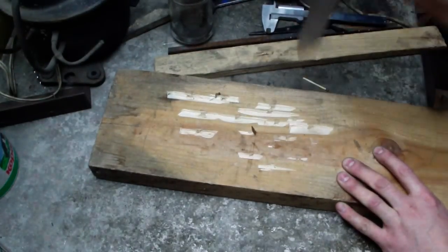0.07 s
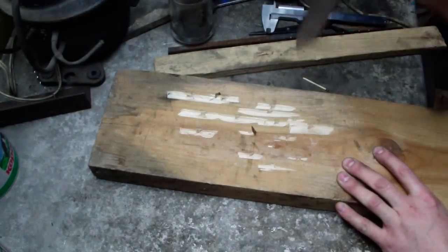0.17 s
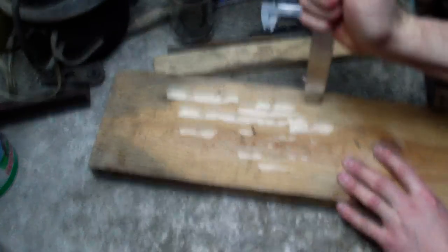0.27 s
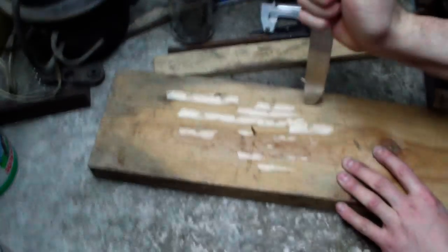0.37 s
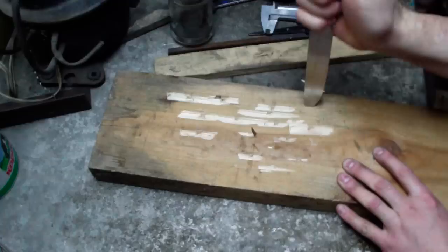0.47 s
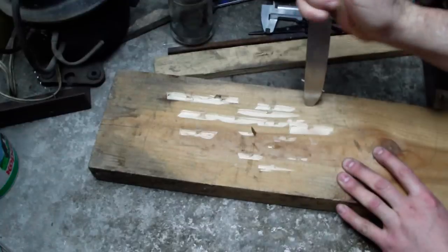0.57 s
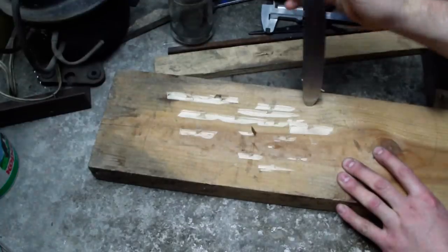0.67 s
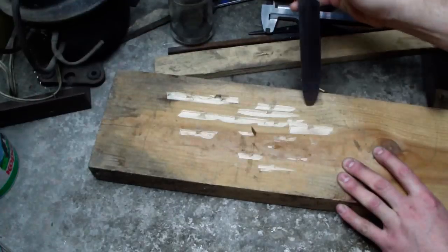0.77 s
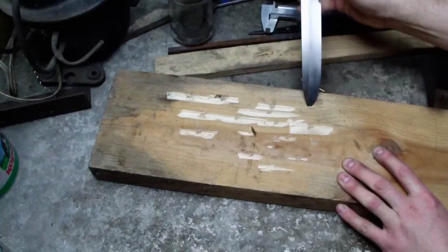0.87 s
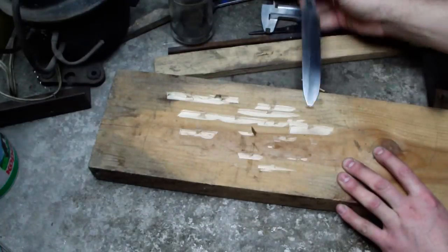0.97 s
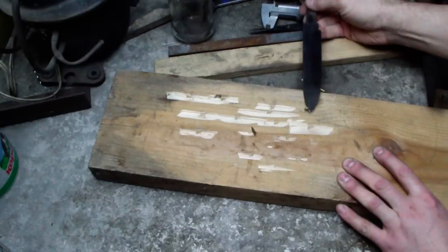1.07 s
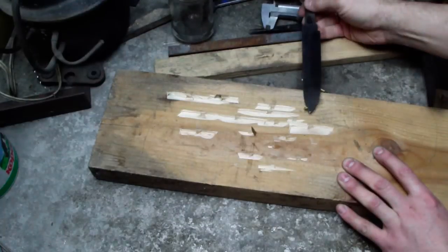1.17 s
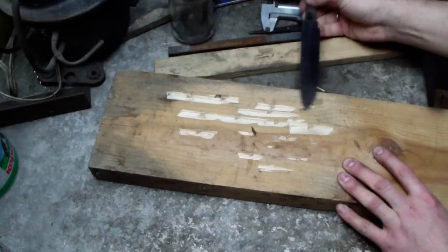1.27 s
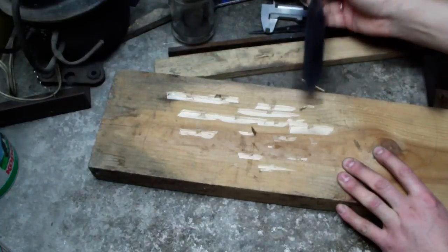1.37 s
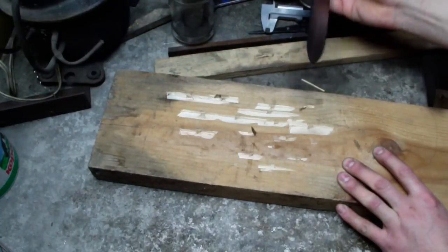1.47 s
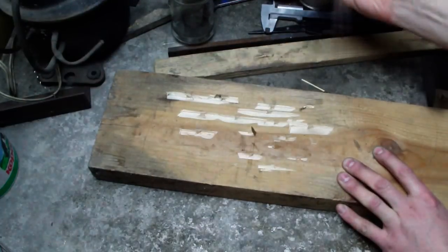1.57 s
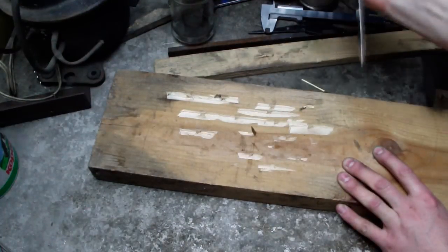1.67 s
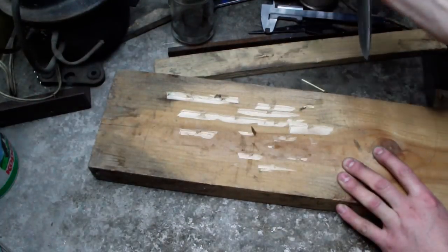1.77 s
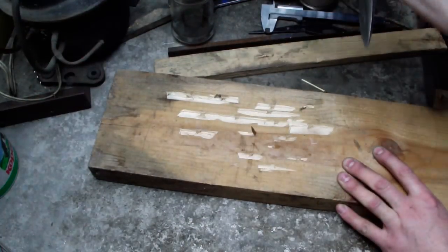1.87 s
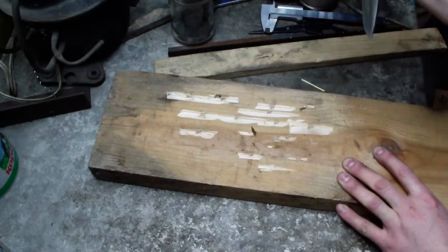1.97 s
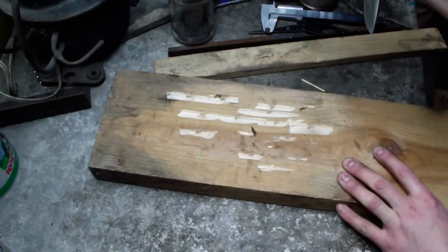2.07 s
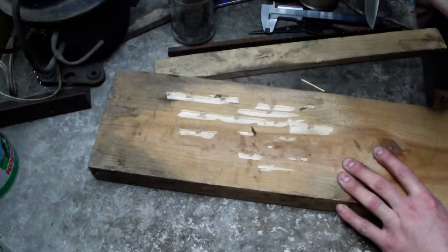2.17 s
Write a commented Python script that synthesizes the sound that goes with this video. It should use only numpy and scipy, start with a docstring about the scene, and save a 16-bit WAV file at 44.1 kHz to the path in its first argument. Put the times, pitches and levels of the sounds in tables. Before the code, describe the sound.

A knife is driven into a wooden plank with a loud sharp knock, rapid chatter and low bench boom; small steel clicks follow, then uneven plank knocks as it pulls free, close and overloaded in a small workshop.

```python
"""Knife stabbed into a plank

A knife is stabbed into a plank on a workbench: the bench booms and the plank and loose tools chatter.
The blade clicks as it is levered, then the plank lifts and knocks back down while the point pulls free.
Knocks and clicks are bursts of coloured reflections plus ringing; squeals are brief trembling sine tones.
A small workshop adds shaped hiss and a thin whine, all heard by a close, overloaded microphone."""
import sys
import numpy as np
from scipy import signal
from scipy.fft import rfft, irfft
from scipy.io import wavfile
from scipy.ndimage import uniform_filter1d

SR = 44100
rng = np.random.default_rng(int(sys.argv[2]) if len(sys.argv) > 2 else 0)


def to_wav(sig):
    """Store sig (one row per channel, or 1-D mono) as 16-bit WAV at the path in sys.argv[1].

    Samples outside -1..1 are clipped; the rate is SR.
    """
    pcm = np.clip(np.atleast_2d(sig), -1, 1) * 32767
    pcm = np.round(pcm).astype(np.int16)
    wavfile.write(sys.argv[1], SR, pcm.T)  # frames by channels


N = 97020
T = np.arange(round(0.6 * SR)) / SR  # clock of one short sound, in seconds


def amp(db):
    """Turns decibels into a gain."""
    return 10 ** (np.asarray(db) / 20)


def evened(x):
    """Scales a signal to an rms (average strength) of one."""
    return x / np.sqrt(np.mean(x ** 2) + 1e-20)


def read(points, hz):
    """Reads a curve between its points, along a logarithmic pitch axis."""
    point_hz, value = np.transpose(points)
    return np.interp(np.log(hz + 1), np.log(point_hz + 1), value)


def fade(t, t60):
    """Dies away by 60 dB in t60 seconds; stays full before time zero."""
    return np.exp(-np.log(1000) * np.maximum(t, 0) / t60)


def hump(length):
    """Swells and sinks once within the length in seconds, as half a sine wave."""
    return np.sin(np.pi * np.minimum(T / length, 1))


def add(mix, s, sound):
    """Lays a sound into the mix, starting at s seconds."""
    part = mix[:, round(s * SR):][:, :sound.shape[-1]]
    part += sound[..., :part.shape[1]]


def shaped_noise(gain):
    """Noise as long as the scene, with a gain for each frequency."""
    return irfft(rfft(rng.standard_normal(N)) * gain, N)


def coloured(x, points, tilt=((1, 0), (2, 0))):
    """Filters by a colour of unit power, then a tilt in dB, with no sound ahead of its cause."""
    size = 2048
    hz = abs(np.fft.fftfreq(size, 1 / SR))
    gain = evened(amp(read(points, hz))) * amp(read(tilt, hz))
    # the Hilbert transform gives the phase that puts the energy as early as possible
    spectrum = np.exp(np.conj(signal.hilbert(np.log(gain + 1e-6))))
    taps = np.fft.ifft(spectrum).real
    return signal.fftconvolve(x, taps[None, :size // 2], axes=1)[:, :x.shape[1]]


def reflections():
    """Dense echoes of random sign that differ between the ears mostly in the treble."""
    # Left-right difference of the echoes. Each row: frequency in Hz, level in dB.
    width = [(100, -59), (500, -48), (1500, -40), (3000, -31.5), (8000, -27), (15000, -19)]
    signs = rng.choice([-1., 1.], (2, len(T)))
    kept = rng.random((2, len(T))) < 1 / 5  # about one moment in five has an echo
    mid, side = signs * np.sqrt(5) * kept
    side = irfft(rfft(side) * amp(read(width, np.fft.rfftfreq(len(T), 1 / SR))), len(T))
    return np.array([mid + side, mid - side])


def ring(modes, tilt, detune=0.0037):
    """A struck body rings in several fading tones, a little different with each contact."""
    chance = rng.uniform(-1, 1, (len(modes), 2))
    tones = np.zeros(len(T))
    for (hz, db, t60), (a, b) in zip(modes, chance):
        tone = np.sin(2 * np.pi * hz * (1 + detune * a) * T + np.pi * b)
        tones += amp(db + read(tilt, hz)) * fade(T, t60) * tone
    return tones * np.minimum(T / 0.00126, 1)  # soft start, in seconds


def hiss():
    """Steady noise whose level shifts slightly in patches, partly shared by the two sides."""
    # Colour of the hiss. Each row: frequency in Hz, level in dB.
    air = [(12, -30), (20, 1.5), (32, 1), (44, -17.5), (80, -1), (112, -16), (225, -12), (266, -22),
           (362, -17), (478, -19), (705, -24), (788, -20), (932, -24.5), (1270, -15.5), (1410, -18.5),
           (1630, -22.5), (1770, -3.5), (2030, -22), (2840, -12), (4190, -20.5), (6720, -28.5), (7310, -18),
           (7950, -26), (13500, -30), (15500, -14)]
    # How alike left and right are. Each row: frequency in Hz, likeness (1 is identical).
    likeness = [(60, 1.0), (150, 1.0), (380, 1.0), (950, 1.0), (2380, 0.98), (5980, 0.56), (15000, -0.4)]
    level_db, patch_db = -31.5, 1.5
    frames, hz = N // 512 + 5, np.fft.rfftfreq(2048, 1 / SR)
    a, b, c, d, patches = rng.standard_normal((frames, len(hz), 5)).T
    patches = uniform_filter1d(patches, size=20, axis=0)  # smooth over frequency
    patches = evened(uniform_filter1d(patches, size=6, axis=1))  # smooth over time
    same = np.clip(read(likeness, hz), -1, 1)[:, None]
    left = a + 1j * b
    right = same * left + np.sqrt(1 - same ** 2) * (c + 1j * d)
    z = np.array([left, right]) * amp(read(air, hz)[:, None] + patch_db * patches)
    noise = signal.istft(z, nperseg=2048, noverlap=1536)[1][:, :N]
    return amp(level_db) * evened(noise)


def whirr():
    """Two soft narrow bands of noise, the same on both sides."""
    # Each row: centre in Hz, width in Hz, level in dB.
    bands = [(1800, 93, -46), (2873, 90, -46.5)]
    hz = np.fft.rfftfreq(N, 1 / SR)
    out = np.zeros(N)
    for centre, width_hz, db in bands:
        out += amp(db) * evened(shaped_noise(1 / (1 + ((hz - centre) / width_hz) ** 2)))
    return out


def whine(hz=7440.4, db=-43.5, octave_db=-58.5):
    """A thin electrical whine: a steady tone and a weaker one an octave above."""
    t = np.arange(N) / SR
    low = amp(db) * np.sin(2 * np.pi * hz * t)
    high = amp(octave_db) * np.sin(2 * np.pi * 2 * hz * t)
    return np.sqrt(2) * (low + high)  # the root of two makes the levels rms


def rumble():
    """Deep noise, its own wobble evened out, follows a level that rises around the stab."""
    # Level over time. Each row: time in seconds, level in dB.
    course = [(0, -32.5), (0.178, -33), (0.3, -19), (0.35, -9.5), (0.41, -13.5), (0.46, -26),
              (0.599, -31.5), (0.75, -38.5), (1.3, -38.5), (1.7, -45), (2.2, -44)]
    # Colour of the deep noise. Each row: frequency in Hz, level in dB.
    deep_colour = [(8, -21), (28, 0.5), (45, -6.5), (65, -7.5), (100, -14), (170, -29), (500, -62.5)]
    deep = signal.hilbert(shaped_noise(amp(read(deep_colour, np.fft.rfftfreq(N, 1 / SR)))))
    deep = evened(deep.real / uniform_filter1d(abs(deep), size=3000))
    return deep * amp(np.interp(np.arange(N) / SR, *np.transpose(course)))


def ticks(t60=0.02, room_db=-24):
    """Tiny dry snaps of wood fibre and handle: short bursts of echoes with a faint room tail."""
    # Each row: start in seconds, level in dB.
    snaps = [(0.022, -23.5), (0.1905, -22), (0.445, -24.5), (0.476, -26.5), (0.502, -25.5), (0.6042, -27),
             (0.611, -28), (0.7057, -23), (0.9235, -24), (1.993, -26.5), (2.0945, -19.5), (2.188, -25.5)]
    # Colour of a snap. Each row: frequency in Hz, level in dB.
    snap_colour = [(200, -46), (1500, -13.5), (2600, -6.5), (3400, 2), (4300, -11.5), (5500, -21),
                   (8500, -15.5), (14000, -42.5)]
    out = np.zeros((2, N))
    for s, db in snaps:
        burst = reflections() * (fade(T, t60) + amp(room_db) * fade(T, 0.34))
        add(out, s, amp(db) * coloured(burst, snap_colour))
    return out


def squeals(jitter=0.043):
    """Steel rubs on wood: brief tones whose pitch trembles at random by the jitter share."""
    # Each row: start in seconds, middle pitch in Hz, level in dB, length in seconds.
    squeaks = [(0.192, 3400, -14.5, 0.0037), (0.375, 1842, -9.5, 0.018), (0.879, 1262, -22, 0.022),
               (0.972, 1710, -13, 0.015), (1.542, 8260, -33.5, .016)]
    out = np.zeros((2, N))
    for s, hz, db, length in squeaks:
        tremble = evened(uniform_filter1d(rng.standard_normal(len(T)), size=40))
        phase = 2 * np.pi * np.cumsum(hz * (1 + jitter * tremble)) / SR
        add(out, s, amp(db) * hump(length) * np.sin(phase))
    return out


def knock(db, body_db, bite_db, edge_db, t60, crack, hold_s, ring_db):
    """One contact of the plank: a crack, a cluster of near echoes, ringing and the room's tail."""
    # Colour of a knock. Each row: frequency in Hz, level in dB.
    knock_colour = [(40, -2), (150, -1), (340, -2), (600, -1), (1000, -1), (1900, -3.5), (3200, 0),
                    (3900, -9), (4900, -27.5), (6500, -18.5), (8400, -14), (10500, -27), (15000, -50)]
    # Ringing of the plank and what lies by it. Each row: middle pitch in Hz, relative level in dB,
    # time to fade by 60 dB in seconds.
    plank_modes = [(187, -25, 0.74), (244.7, -26.5, .3), (434, -18, 0.23), (543, -22, 0.13),
                   (620.5, -13, 0.22), (936.3, -7.5, 0.14), (1180, -25, 0.14), (1453, -12.5, 0.1),
                   (1616, -12, 0.17), (1930, -19.5, 0.14), (2460, -34, .12), (3085, -23, 0.52),
                   (3400, -13, 0.08)]
    room_db, room_t60 = -23, 0.72
    tilt = [(1100, body_db), (2200, 0), (3100, 0), (4400, bite_db), (6500, edge_db)]
    room_tilt = [(300, 4 + 0.5 * body_db), (2000, 0), (6500, edge_db - 4)]
    taps = reflections()
    burst = taps * fade(T - hold_s, t60)
    burst[:, 0] += crack
    near = coloured(burst, knock_colour, tilt)
    ringing = amp(ring_db) * ring(plank_modes, tilt, detune=0.0124)
    tail = coloured(taps[:, ::-1] * fade(T, room_t60), knock_colour, room_tilt)
    return amp(db) * (near + ringing + amp(room_db) * tail)


def plank():
    """The stab and the later knocks, each with a low fading sine as the thump of the bench."""
    # Each row: start in seconds, level in dB, body up to 1.1 kHz in dB, bite near 4.4 kHz in dB,
    # edge from 6.5 kHz up in dB, bench thump in dB, time for the near echoes to fade by 60 dB in seconds.
    knocks = [(0.202, -16, 5, 1, 10.5, -11, 0.05), (0.2055, -10, 3.5, 0, 5, -13, 0.094),
              (0.216, -5.5, -21, 3, -2, -33, 0.14), (0.356, -19, 2, 1, -2, -30, .1),
              (0.3716, -13.5, -6, 2, -32, -24, 0.027), (0.3768, -7, -12.5, -7, -10, -38, 0.033),
              (0.386, -19.5, -2.5, -1, 3, -33, 0.074), (0.965, -24.5, 0.5, -15, 2, -33, 0.079),
              (0.9736, -17, -5, 4.5, 5.5, -23, .06), (0.991, -27.5, 5.5, 8, 7, -26, 0.11),
              (1.007, -20.5, -18, 1, 1, -42, 0.043), (1.0245, -4.5, -5, -4, -11, -41, 0.089),
              (1.035, -15, 3, 5.5, -3, -27.5, 0.15), (1.0679, -16, -17, -1, 9, -39, 0.066),
              (1.099, -17, -16, 4, -1, -44, 0.046), (1.1079, -9.5, -8, 5.5, -0.5, -41, 0.084),
              (1.2441, -11.5, 4, -16, -12, -24, 0.055), (1.251, -12, 1.5, 0, -6.5, -22, 0.15),
              (1.265, -20, 7, -14, -10, -22.5, 0.098), (1.277, -22, 5.5, -8, 3, -23, 0.2),
              (1.31, -21, -7, 7, 8.5, -29, .06), (1.3173, -9.5, -1.5, 7, -0.5, -28, 0.1),
              (1.3815, -22.5, 10, -11, -2, -36, 0.12), (1.4175, -29, 4, 8, 1, -23.5, 0.094),
              (1.4405, -31.5, 8.5, 8.5, 5, -28, 0.12), (1.49, -34, 10.5, -3, 6, -30.5, .16),
              (1.549, -47, 14.5, -3, -1, -42, 0.084), (1.631, -50.5, 16, -4, -3, -42, 0.26)]
    out = np.zeros((2, N))
    for s, db, body_db, bite_db, edge_db, thump_db, t60 in knocks:
        add(out, s, knock(db, body_db, bite_db, edge_db, t60, crack=9.7, hold_s=0.0037, ring_db=0.5))
        thump_hz = 75.2 * rng.uniform(0.926, 1.063)
        add(out, s, amp(thump_db) * fade(T, 0.39) * np.sin(2 * np.pi * thump_hz * T))
    return out


def chatter():
    """Plank and loose tools bounce rapidly on the shaken bench: a quick run of uneven knocks."""
    start_s, end_s, bounces_per_s = 0.227, 0.348, 105
    out = np.zeros((2, N))
    for k, (late, loud, body, edge) in enumerate(rng.standard_normal((24, 4))):
        s = start_s + k / bounces_per_s
        if s > end_s:
            break
        u = (s - start_s) / (end_s - start_s)  # 0 at the first bounce, near 1 at the last
        db = -11 - u ** 2 + 0.5 * loud
        body_db = -2.5 + 1.2 * body
        edge_db = 1.5 - 3 * u + 2.2 * edge
        bounce = knock(db, body_db, -0.56, edge_db, 0.09, crack=15, hold_s=0.0032, ring_db=-4.5)
        add(out, s + 0.002 * late, bounce)
    return out


def boom(start_s=0.24, hold_s=0.1, t60=0.51):
    """The bench top booms after the stab: low tones of wavering pitch hold, then die away."""
    # Each row: middle pitch in Hz, level in dB.
    bench_modes = [(80, -12), (95, -11), (189, -27.5), (245, -25.5)]
    out = np.zeros((2, N))
    swell = np.minimum(0.86 + 10 * T, 1) * fade(T - hold_s, t60)  # full after 14 ms
    for hz, db in bench_modes:
        waver = 1 + 0.036 * evened(uniform_filter1d(rng.standard_normal(len(T)), size=1500))
        add(out, start_s, amp(db) * swell * np.sin(2 * np.pi * np.cumsum(hz * waver) / SR))
    return out


def scrapes(grain_db=3):
    """The blade slides in its cut: faint coloured noise with a quickly changing, grainy level."""
    # Each row: start in seconds, length in seconds, level in dB.
    slides = [(0.462, 0.13, -42), (0.927, 0.066, -35.5), (1.223, 0.092, -31)]
    # Colour of a scrape. Each row: frequency in Hz, level in dB.
    scrape_colour = [(1000, -34), (5500, -15), (7000, -7), (8600, -4), (10000, -15), (15000, -32)]
    out = np.zeros((2, N))
    for s, length, db in slides:
        unsteady = evened(uniform_filter1d(rng.standard_normal(len(T)), size=120))
        grain = evened(amp(grain_db * unsteady))
        add(out, s, amp(db) * coloured(reflections() * hump(length) * grain, scrape_colour))
    return out


def blade(t60=0.074, hold_s=0.0028, room_db=-23, crack=4, burst_db=-4.0):
    """Bright steel clicks as the point is levered and slips in the wood: echoes plus ringing."""
    # Each row: start in seconds, level in dB, edge from 6.5 kHz up in dB.
    clicks = [(0.6732, -24, -3), (0.7373, -25.5, 3), (0.761, -19, 2.5), (0.7834, -15.5, -1),
              (0.8589, -17.5, 3.5), (0.8832, -16, -8.5)]
    # Ringing of the wedged blade. Each row: middle pitch in Hz, relative level in dB,
    # time to fade by 60 dB in seconds.
    blade_modes = [(550, -18, 0.12), (977, -18.5, 0.21), (1257, -14, 0.13), (1550, -13, 0.11),
                   (2437, -8.5, 0.068), (2690, -19, 0.079), (3180, -14, 0.13), (6640, -19, 0.13),
                   (7950, -1.5, 0.066), (7470, -21, 0.084), (9400, -29, .08), (9300, -18, .1),
                   (11800, -21, .08)]
    # Colour of a click. Each row: frequency in Hz, level in dB.
    click_colour = [(150, -12), (500, -13), (1100, -0.5), (2000, -6), (2900, 5.5), (4000, -11.5),
                    (5300, -23), (7000, -8), (8100, 0), (10000, -10), (11500, -9), (15000, -44)]
    out = np.zeros((2, N))
    for s, db, edge_db in clicks:
        tilt = [(4000, 0), (6500, edge_db)]
        burst = reflections() * (fade(T - hold_s, t60) + amp(room_db) * fade(T, 0.72))
        burst[:, 0] += crack
        near = amp(burst_db) * coloured(burst, click_colour, tilt)
        add(out, s, amp(db) * (near + ring(blade_modes, tilt)))
    return out


def scene():
    """The work lies a little to the right, so it reaches the left ear slightly later."""
    background = hiss() + whirr() + whine() + rumble()
    left, right = ticks() + squeals() + plank() + chatter() + scrapes() + blade()
    lag_s = 2.6e-5
    left = irfft(rfft(left) * np.exp(-2j * np.pi * np.fft.rfftfreq(N, 1 / SR) * lag_s), N)
    return np.array([left, right]) + boom() + background


def record(dry):
    """The microphone squashes the loudest peaks under a ceiling of 1, then the top treble is cut."""
    squashed = dry / (1 + dry ** 6) ** (1 / 6)
    low_pass = signal.firwin(511, 15500, window=("kaiser", 9), fs=SR)  # cutoff in Hz
    return signal.oaconvolve(squashed, low_pass[None], "same")


dry = scene()
out = record(dry)
to_wav(out)
```